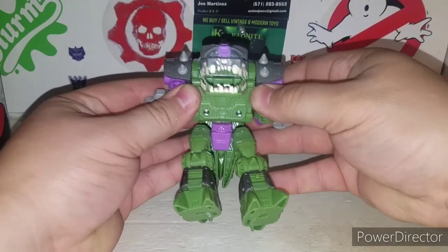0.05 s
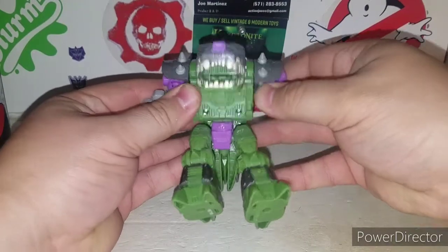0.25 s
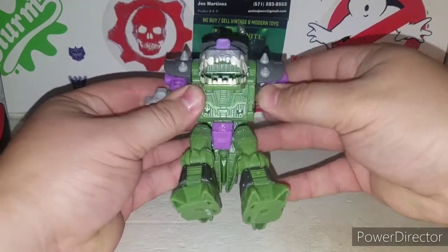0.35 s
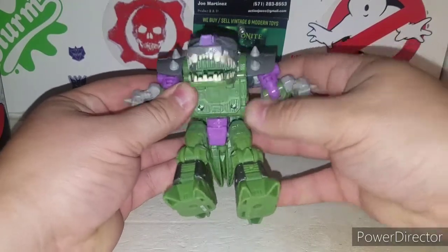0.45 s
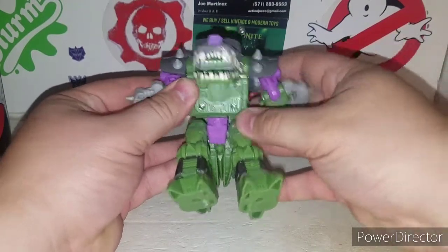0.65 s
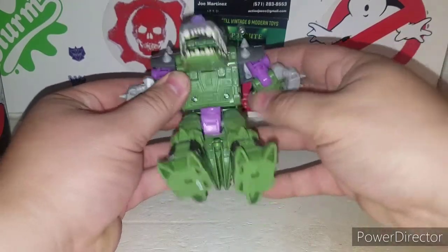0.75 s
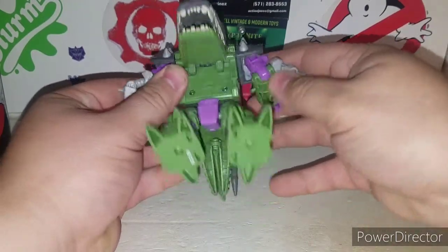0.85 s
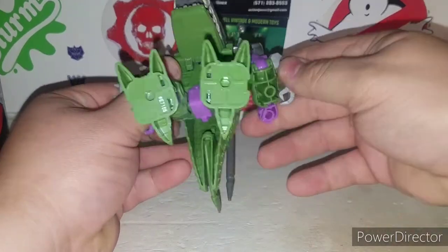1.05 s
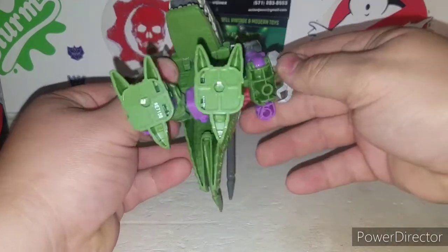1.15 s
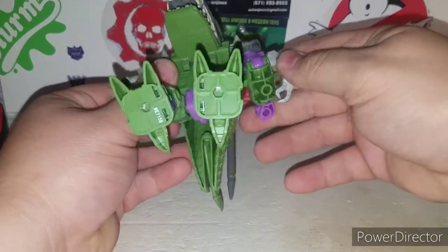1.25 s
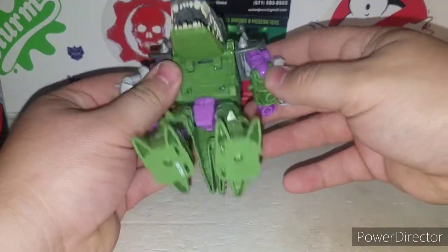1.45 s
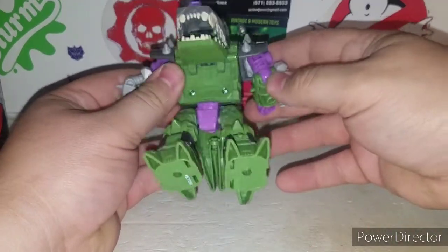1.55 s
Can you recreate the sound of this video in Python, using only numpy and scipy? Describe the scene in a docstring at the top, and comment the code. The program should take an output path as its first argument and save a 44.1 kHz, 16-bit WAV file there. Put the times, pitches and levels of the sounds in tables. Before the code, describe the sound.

Hands fold a hollow plastic toy: one loud early snap, looser clicks and soft table thuds, a short scrape, then a duller quick double knock with a lingering echo, over low hum and hiss indoors.

```python
"""A low hum and hiss is heard first; then hands fold the limbs of a hollow plastic toy over a table.
Joints snap and parts tap: chatter excites the toy's modes, and a softer push makes the table top thud.
The toy's feet scrape briefly as dense grains, and a rubbing joint fizzes and rattles.
One duller double knock rings a few modes and leaves a longer echo of decaying noise in the quiet room."""
import sys
import numpy as np
from scipy import signal
from scipy.io import wavfile
from scipy.ndimage import uniform_filter1d

SR = 44100
rng = np.random.default_rng(int(sys.argv[2]) if len(sys.argv) > 2 else 0)


def log_audio(samples):
    """Write samples as a 16-bit WAV file to the path given in sys.argv[1]."""
    # one column per channel
    frames = np.atleast_2d(samples).T
    # limit to full scale, then quantise
    limited = np.clip(frames, -1, 1)
    pcm = np.round(limited * 32767).astype(np.int16)
    wavfile.write(sys.argv[1], SR, pcm)


N = 70560


def amp(db):
    """Logarithmic level: decibels to an amplitude factor."""
    return 10 ** (np.asarray(db) / 20)


def rms_one(x):
    """Normalisation: scale to unit root mean square."""
    return x / np.sqrt(np.mean(x ** 2) + 1e-20)


def at_hz(points, hz):
    """Spectral interpolation: read a table along log frequency."""
    table = np.array(points)
    return np.interp(np.log(hz), np.log(table[:, 0]), table[:, 1])


def band(x, low_hz, high_hz):
    """Band-pass filtering: keep what lies between two frequencies."""
    sos = signal.butter(2, [low_hz, high_hz], "band", fs=SR, output="sos")
    return signal.sosfilt(sos, x)


def high_pass(x, order, hz):
    """High-pass filtering: keep what lies above a frequency."""
    return signal.sosfilt(signal.butter(order, hz, "high", fs=SR, output="sos"), x)


def drift(rate_hz):
    """Random modulation: twice low-passed noise of unit rms, made at one point per 40 samples."""
    r = np.exp(-80 * np.pi * rate_hz / SR)
    white = rng.standard_normal(N // 40 + 2002)
    slow = signal.lfilter([1], [1, -2 * r, r * r], white)[2000:]  # filter already settled
    return np.interp(np.arange(N) / 40, np.arange(len(slow)), rms_one(slow))


def ring(clicks, hz, t60):
    """Damped resonance: a unit click starts a sine of height about 1 that falls 60 dB in t60 seconds."""
    r, w = amp(-60 / (t60 * SR)), 2 * np.pi * hz / SR
    return signal.lfilter([0, np.sin(w)], [1, -2 * r * np.cos(w), r * r], clicks + 1e-18)


def sparse_grains(length, per_s):
    """Random impact process: isolated clicks of random height at a mean rate."""
    return rng.standard_normal(length) * (rng.random(length) < per_s / SR)


def place(x, pan_db, lead_s=0):
    """Interaural cues: a level difference (positive is left) and an earlier arrival at the left."""
    left, right = x * np.ones((2, 1))
    right = np.roll(right, round(lead_s * SR))
    return np.array([left, right]) * amp([[pan_db / 2], [-pan_db / 2]])


def add(out, s, x):
    """Superposition: mix a short sound in at a time."""
    i = int(s * SR)
    out[:, i:i + x.shape[1]] += x[:, :N - i]


# left-right likeness of diffuse noise: (frequency [Hz], correlation [-1 to 1])
LIKENESS = [(200, 0.69), (500, 0.2), (1500, 0.23), (4000, 0.25), (15000, 0.051)]


def noise(spectrum, patchy_db):
    """Partial coherence: third-octave noise mixed from sum and difference parts, with wandering levels."""
    out, edges = 0, 25 * 2 ** np.arange(0, 9.5, 1 / 3)
    white = rng.standard_normal((2, 2, N))
    for k, (low, high) in enumerate(zip(edges, edges[1:])):
        mid, side = band(white[k % 2], low, high)
        hz = np.sqrt(low * high)
        alike = np.clip(at_hz(LIKENESS, hz), -1, 1)
        stereo = np.sqrt(1 + alike) * mid + np.sqrt(1 - alike) * side * [[1], [-1]]
        out = out + amp(at_hz(spectrum, hz) + patchy_db * drift(6.2)) * stereo
    return rms_one(out)


# shape of the noise floor: (frequency [Hz], relative level [dB per Hz])
FLOOR = [(25, -14), (157, -3), (242, -13.5), (354, -12.5), (489, -19.5), (1260, -15.5), (2480, -24),
         (7110, -35), (14800, -32.5), (16000, -36)]
# wavering low tones: (frequency [Hz], bandwidth [Hz], rms level [dB])
HUMS = [(135.7, 9.9, -65.5), (188, 20, -68.5), (69, 24, -64)]
FLOOR_DB, FLOOR_PATCHY_DB = -63.5, 2  # rms level; spread of each band's wandering


def background():
    """Stationary noise and narrow-band resonance: hiss and rumble under noise-driven hums."""
    hums = 0
    for hz, width_hz, db in HUMS:
        t60 = np.log(1000) / (np.pi * width_hz)  # a narrower resonance rings longer
        hums = hums + amp(db) * rms_one(ring(rng.standard_normal(N), hz, t60))
    return amp(FLOOR_DB) * noise(FLOOR, FLOOR_PATCHY_DB) + hums


ROOM_DB, ROOM_T60_S, ROOM_LOW_HZ, ROOM_CUT_HZ = -14, 0.098, 300, 8300


def room(x):
    """Diffuse reverberation: convolution with dying noise, different at each ear."""
    t = np.arange(SR // 2) / SR
    tail = rng.standard_normal((2, len(t))) * amp(-60 * t / ROOM_T60_S) * (t > .002)
    tail = band(tail, ROOM_LOW_HZ, ROOM_CUT_HZ)
    tail /= np.sqrt(np.sum(tail ** 2, axis=1, keepdims=True))  # unit energy
    return amp(ROOM_DB) * signal.fftconvolve(x, tail, axes=1)[:, :N]


# colour of the knock's echo: (frequency [Hz], relative level [dB per Hz])
ECHO = [(300, -20), (469, -3), (700, -11), (1840, -6.5), (2600, -28), (5000, -60)]
ECHO_DB, ECHO_RISE_S, ECHO_T60_S = -48.5, 0.085, 0.69  # level before the rise and decay are applied
ECHO_PATCHY_DB = 2


def echo():
    """Build-up and decay of a diffuse field: the knock's tail swells and dies."""
    t = np.maximum(np.arange(N) / SR - KNOCKS[0][0], 0)
    swell = 1 - np.exp(-t / ECHO_RISE_S)
    return amp(ECHO_DB - 60 * t / ECHO_T60_S) * swell * noise(ECHO, ECHO_PATCHY_DB)


# the toy's modes, shared by rub, scrape and contacts:
# (frequency [Hz], relative level [dB], t60 [s], before the scrape's extra damping)
TOY = [(635, 6, 0.024), (830, -1, .02), (1371, -0.5, 0.019), (1678, -5, 0.017), (1794, -3.5, 0.031),
       (2020, -1.5, 0.012), (2419, 6, 0.0091), (2962, 9.5, 0.016), (4360, 7, 0.0044), (4870, 3, 0.0059),
       (5590, 7, 0.00695), (6940, 13, 0.0083), (7510, -5.5, .007), (11730, 4.5, 0.0054),
       (13610, 3.5, 0.0069)]
PAN_DB, LEAD_S = 2.2, .00014  # toy's level difference; left lead of rub, scrape and knock
RUB_S, RUB_LENGTH_S = 1.144, 0.024
RUB_DB, RUB_LOW_HZ = -60, 8800  # fizz
RUB_RATTLE_DB, RUB_GRAINS_PER_S = -56.5, 2100


def rub():
    """Sliding friction: a joint's high fizz over a rattle of the shell's middle modes."""
    t = np.arange(N) / SR
    fizz = rms_one(high_pass(rng.standard_normal(N), 4, RUB_LOW_HZ))
    grains = sparse_grains(N, RUB_GRAINS_PER_S)
    rattle = sum(amp(db) * band(ring(grains, hz, t60), hz / 1.2, hz * 1.2)
                 for hz, db, t60 in TOY if 1500 < hz < 2800)
    sound = amp(RUB_DB + 2 * drift(150)) * fizz + amp(RUB_RATTLE_DB) * rms_one(rattle)
    gate = 1. * (t > RUB_S) * (t < RUB_S + RUB_LENGTH_S)
    return place(sound * uniform_filter1d(gate, size=100), PAN_DB, LEAD_S)  # softened edges


# scrape's envelope: (time [s], level [dB])
SCRAPE = [(.69, -77), (0.723, -61.5), (.76, -53.5), (0.799, -52), (0.814, -59), (0.832, -68.5)]
SCRAPE_GRAINS_PER_S, SCRAPE_TILT_DB_PER_OCTAVE = 9000, -5
SCRAPE_DAMPING = 0.8  # factor on the ringing times


def scrape():
    """Stick-slip as dense impacts: small grains excite the toy's damped modes under the stroke."""
    s, level_db = np.transpose(SCRAPE)
    grains = sparse_grains(N, SCRAPE_GRAINS_PER_S)
    body = 0
    for hz, db, t60 in TOY[:10]:
        tilt_db = SCRAPE_TILT_DB_PER_OCTAVE * np.log2(hz / 600)
        body = body + amp(db + tilt_db) * ring(grains, hz, t60 * SCRAPE_DAMPING)
    envelope = amp(np.interp(np.arange(N) / SR, s, level_db, -120, -120))
    return place(rms_one(body) * envelope, PAN_DB, LEAD_S)


# blows of the double knock: (time [s], relative strength [dB])
KNOCKS = [(1.2503, -29), (1.2543, -30)]
# modes the knock rings: (frequency [Hz], relative level [dB], t60 [s])
KNOCKED = [(256, -11, 0.073), (514, 1, 0.024), (770, -4.5, 0.023), (1030, 1, 0.022), (1282, 2.5, 0.035),
           (1920, 5, 0.016), (2800, -3.5, 0.019), (4070, -4, 0.016), (6000, -17.5, 0.011)]
KNOCK_PAN_DB = 5.5


def knock():
    """Modal excitation: two quick dull blows, each mode band-limited so that it has no click of its own."""
    clicks = np.zeros(N)
    for s, db in KNOCKS:
        clicks[int(s * SR)] = -amp(db)
    body = sum(amp(db - 8) * band(ring(clicks, hz, t60), hz / 4, hz * 1.5) for hz, db, t60 in KNOCKED)
    return place(body, KNOCK_PAN_DB, LEAD_S)


# table top modes; the first is the deep one: (frequency [Hz], relative level [dB], t60 [s])
TABLE = [(59.7, 0, .15), (152.2, 0, 0.085), (188, -1.5, 0.044), (257.2, -3, 0.047)]
THUD_DELAY_S, THUD_SOFT_HZ, THUD_LOW_HZ = 0.002, 502, 102


def low_bodies(t):
    """Soft-contact excitation: a low-passed push rings the table's deep mode, its thud and the toy's hollow."""
    soft = np.exp(-2 * np.pi * THUD_SOFT_HZ / SR)
    delay = int(THUD_DELAY_S * SR)
    push = signal.lfilter([1], [1, -2 * soft, soft * soft], t == t[delay])
    deep = rms_one(ring(push, TABLE[0][0], TABLE[0][2]))
    thud = sum(amp(db) * ring(push, hz, t60) for hz, db, t60 in TABLE[1:])
    thud = rms_one(band(thud, THUD_LOW_HZ, 670))
    # the hollow answers at once, without the table's delay
    hollow = sum(amp(db) * ring(push[delay:], hz, t60) for hz, db, t60 in TOY[:2])
    hollow = np.pad(rms_one(band(hollow, 466, 1200)), (0, delay))
    return deep, thud, hollow


# edges of the shell, crack and treble mode groups: [Hz]
GROUP_EDGES_HZ = [1000, 3500, 9000, 15500]
FAVOUR_DB_PER_OCTAVE = 38  # fall of shell modes away from the favoured pitch
DULLING_PER_OCTAVE = .8  # the fainter the crack against the shell, the more upper modes fall (dB per dB)


def mode_tilt_db(hz, favoured_hz, dull):
    """Spectral weighting: shell modes peak at the favoured pitch, upper modes fall by dulling."""
    if hz < GROUP_EDGES_HZ[1]:
        return -FAVOUR_DB_PER_OCTAVE * abs(np.log2(hz / favoured_hz))
    return dull * np.log2(hz / GROUP_EDGES_HZ[1])


# contacts, with levels relative to a common gain and the shell's also to its peak allowance:
# (time [s], shell level [dB], table deep level [dB], table thud level [dB], toy hollow level [dB],
#  crack level [dB], treble level [dB], favoured shell pitch [Hz], chatter decay time [s])
CONTACTS = [(0.1315, -43, -48, -40.5, -48, -68.5, -79, 1590, 0.0081),
            (0.221, -15, -53, -19, -33.5, -24, -39.5, 1560, 0.0026),
            (0.2248, -25.5, -68, -41, -55, -39, -48, 1800, 0.0053),
            (0.285, -58, -83, -46, -54.5, -78, -74, 2190, 0.0046),
            (0.3033, -47, -67, -56, -61.5, -82, -75, 1970, 0.0039),
            (0.375, -51.5, -78, -40.5, -51.5, -78, -80, 1640, 0.0035),
            (0.4473, -30.5, -48, -49, -65, -50.5, -62.5, 2150, 0.0082),
            (0.4722, -23.5, -37.5, -37.5, -35.5, -32, -54.5, 1910, 0.0041),
            (0.5345, -45, -60, -58, -84, -70, -70, 2000, 0.003),
            (0.5419, -35.5, -64, -53, -94, -54.5, -76, 2520, 0.0034),
            (0.6601, -46, -49, -61, -52.5, -83, -73, 1300, 0.0023),
            (0.6632, -34.5, -63, -32.5, -42, -60.5, -75, 2150, 0.0054),
            (0.7076, -60, -63, -45.5, -84, -71.5, -77, 1300, 0.0049),
            (0.7322, -52, -46, -36.5, -47.5, -87, -76, 2260, 0.0038),
            (0.757, -47, -42, -40, -51, -87, -76, 2200, 0.002),
            (0.8071, -46, -64, -45.5, -62, -73, -69, 2180, 0.0035),
            (0.8674, -63, -62, -48.5, -67.5, -76, -78, 2000, 0.003),
            (0.9012, -45.5, -67.5, -57, -80, -59, -63, 2297, 0.0038),
            (1.021, -46, -57, -71, -80.5, -89, -83, 1880, 0.0021),
            (1.1431, -45, -74, -57.5, -88, -62.5, -53, 2310, 0.0035),
            (1.1633, -45, -69, -62, -81, -90.5, -72.5, 1310, 0.0026),
            (1.1742, -52, -70.5, -69, -101, -86, -80, 2560, 0.0024),
            (1.3098, -43.5, -52.5, -58.5, -66, -70.5, -78, 2030, 0.0036),
            (1.4727, -63, -63, -51, -75, -87, -84, 1350, 0.0042)]
# the toy drifts leftward: (time [s], lead of the left microphone [s])
LEFT_LEAD = [(.3, .00002), (.7, .00013)]
CONTACT_GAIN_DB, SHELL_PEAK_OVER_RMS_DB, THUD_PAN_DB = -17.5, 9.5, -1.5
SHELL_WIDTH = 1.36  # frequency ratio either side of the favoured pitch
CHATTER_PER_S, CHATTER_RISE_S = 5000, 0.0006
# dense small modes heard as noise: level against the distinct modes, part differing at each ear
CRUNCH_DB, CRUNCH_UNLIKE = -3, .8
CRUNCH_TAIL_DB, CRUNCH_TAIL_S = -23, 0.024  # slower second decay


def contacts():
    """Modal synthesis: dying chatter rings the toy's upper modes, a soft push its hollow and the table."""
    out, t = np.zeros((2, N)), np.arange(SR // 5) / SR
    deep, thud, hollow = low_bodies(t)
    rise = 1 - np.exp(-(t / CHATTER_RISE_S) ** 2)
    tail = amp(CRUNCH_TAIL_DB) * np.exp(-t / CRUNCH_TAIL_S)
    for (s, shell_db, deep_db, thud_db, hollow_db,
         crack_db, treble_db, favoured_hz, decay_s) in CONTACTS:
        fall = np.exp(-t / max(decay_s, 2e-4))
        chatter = sparse_grains(len(t), CHATTER_PER_S) * rise * fall
        chatter[int(CHATTER_RISE_S * SR)] = 2  # one sure main click
        shared, *own = rng.standard_normal((3, len(t)))
        crunch = (shared + CRUNCH_UNLIKE * np.array(own)) * rise * (fall + tail)

        dull = DULLING_PER_OCTAVE * min(crack_db - shell_db + 10, 0)
        levels = shell_db - SHELL_PEAK_OVER_RMS_DB, crack_db, treble_db
        shell_span = (favoured_hz / SHELL_WIDTH, favoured_hz * SHELL_WIDTH)
        crunch_spans = [shell_span] + list(zip(GROUP_EDGES_HZ[1:], GROUP_EDGES_HZ[2:]))
        toy = amp(hollow_db) * hollow
        for low, high, span, level_db in zip(GROUP_EDGES_HZ, GROUP_EDGES_HZ[1:], crunch_spans, levels):
            modes = sum(amp(db + mode_tilt_db(hz, favoured_hz, dull)) * ring(chatter, hz, t60)
                        for hz, db, t60 in TOY if low <= hz < high)
            group = rms_one(modes) + amp(CRUNCH_DB) * rms_one(band(crunch, *span))
            group = band(group, max(low, favoured_hz / SHELL_WIDTH ** 2), high)
            toy = toy + amp(level_db) * rms_one(group)

        lead_s = np.interp(s, *np.transpose(LEFT_LEAD))
        table = amp(thud_db) * thud + amp(deep_db) * deep
        # the table moves with opposite sign
        both = place(toy, PAN_DB, lead_s) - place(table, THUD_PAN_DB)
        add(out, s, amp(CONTACT_GAIN_DB) * both)
    return out


def scene():
    """Superposition of direct sound, reverberation, echo and background."""
    near = contacts() + knock() + scrape() + rub()
    return near + room(near) + echo() + background()


MIC_DIP, CUTOFF_HZ = .7, 16700  # share of the dip band taken out; upper limit


def record(dry):
    """Transducer response: the microphone drops the deepest bass and dips near 10 kHz; the top is cut."""
    dry = high_pass(dry, 2, 45)
    dry = dry - MIC_DIP * band(dry, 8210, 10950)
    shelf = signal.sosfilt(signal.cheby2(8, 22, 15900, fs=SR, output="sos"), dry)
    return signal.sosfilt(signal.cheby2(14, 60, CUTOFF_HZ, fs=SR, output="sos"), shelf)


dry = scene()
out = record(dry)
log_audio(out)
```